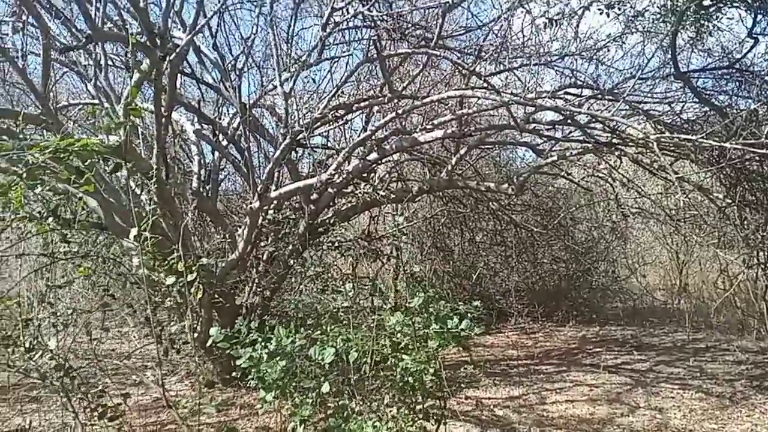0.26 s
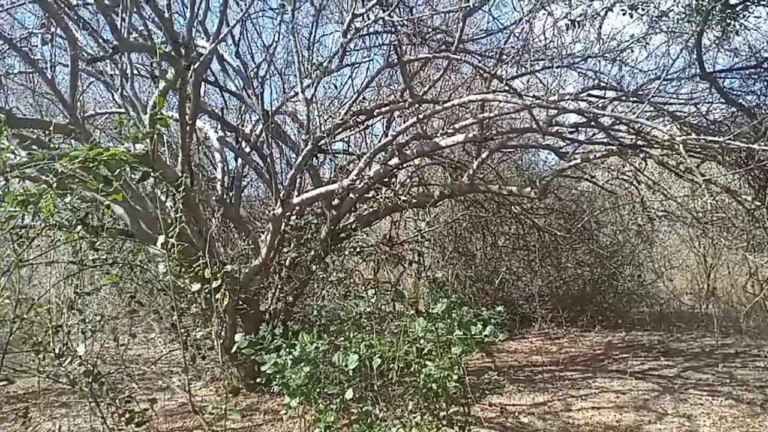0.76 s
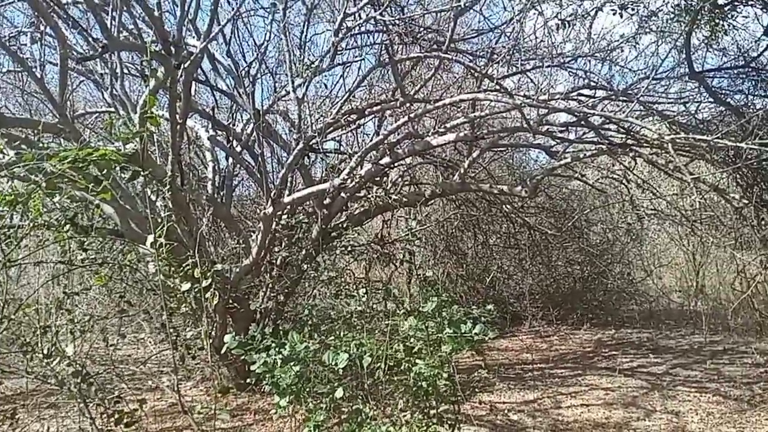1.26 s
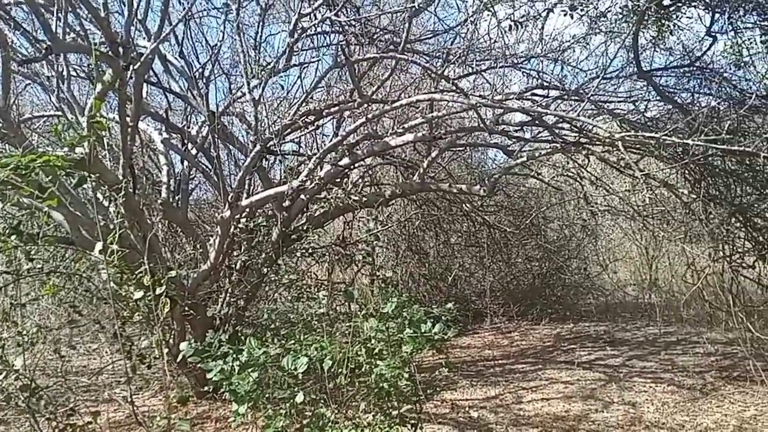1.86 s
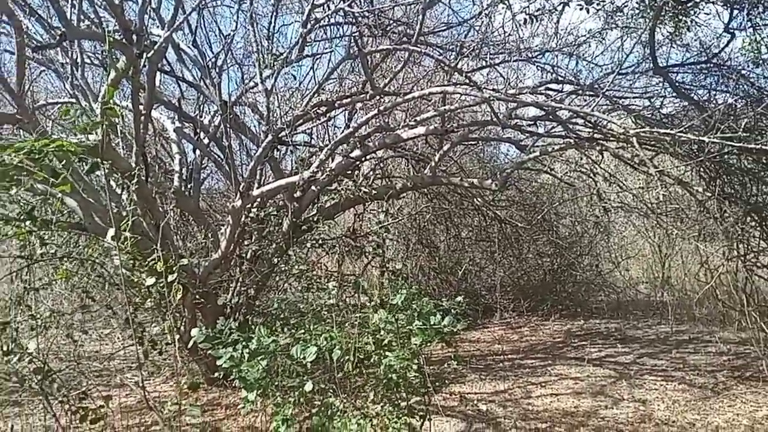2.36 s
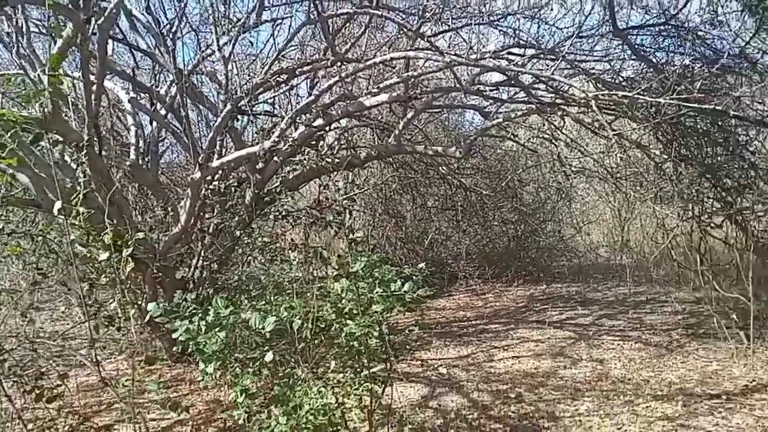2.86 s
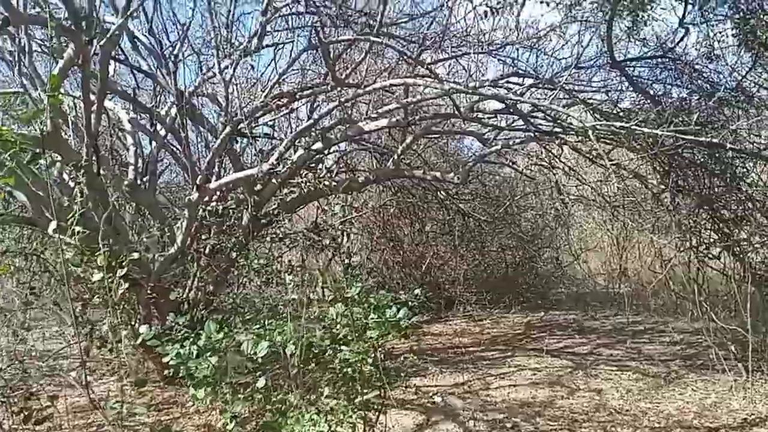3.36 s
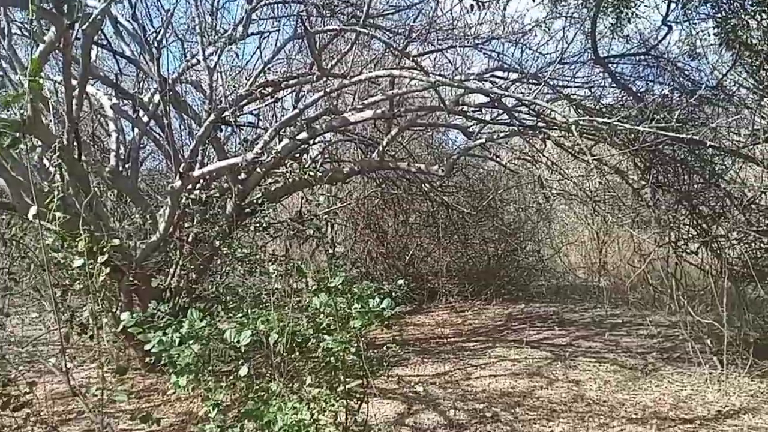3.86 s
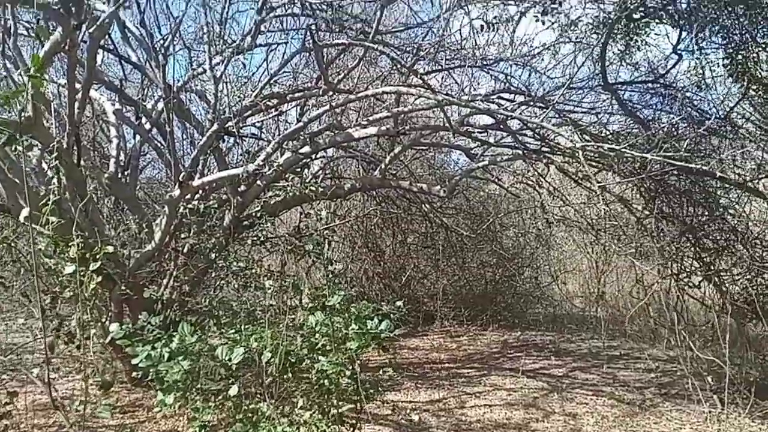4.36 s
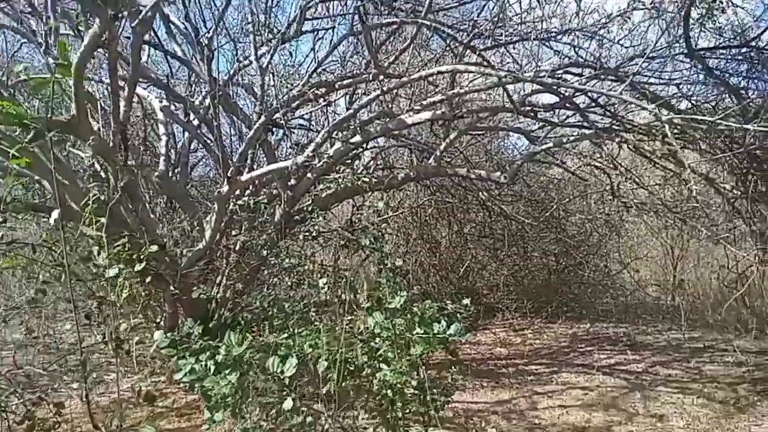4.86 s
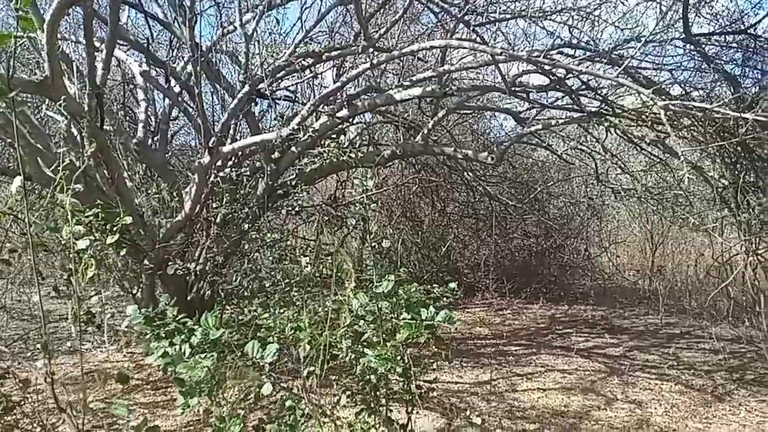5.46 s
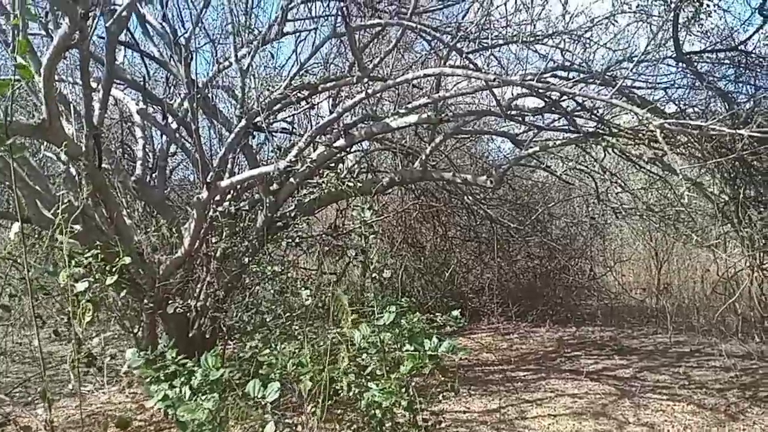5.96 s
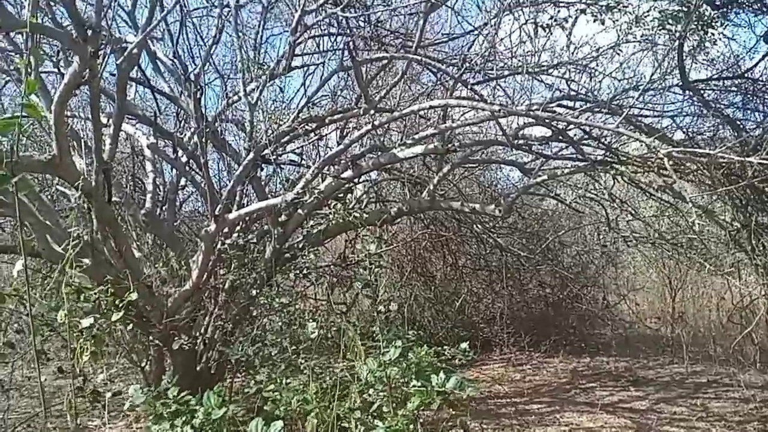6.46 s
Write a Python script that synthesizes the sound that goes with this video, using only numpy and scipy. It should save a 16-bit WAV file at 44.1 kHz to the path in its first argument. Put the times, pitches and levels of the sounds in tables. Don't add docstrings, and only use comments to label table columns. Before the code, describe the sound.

Spaced raspy bird calls echo among bare branches; a sudden low wind thump and crisp leaf-litter crackles interrupt the quiet hush.

```python
import sys
import numpy as np
from scipy import signal
from scipy.fft import rfft, irfft, next_fast_len
from scipy.io import wavfile
from scipy.ndimage import uniform_filter1d, map_coordinates

SR = 44100
rng = np.random.default_rng(int(sys.argv[2]) if len(sys.argv) > 2 else 0)


def how_loud(loudness_db):
    steps = np.asarray(loudness_db, float) / 20
    return 10 ** steps


def file_out(sig):
    cols = np.atleast_2d(sig).T
    lim = np.clip(cols, -1, 1)
    pcm = np.round(lim * 32767).astype(np.int16)
    wavfile.write(sys.argv[1], SR, pcm)


N = 295911

# pitch_hz, level_db [dB per Hz]
AIR_COLOUR = [(35, -26), (60, 0.5), (134, -2), (298, -3), (386, -4), (525, -8), (680, -7.5), (903, -9.5),
              (1450, -11), (2320, -12.5), (2610, -14), (3990, -12.5), (13000, -36), (15300, -19),
              (16800, -46)]
# pitch_hz, left_minus_right_db
LEFT_LEAN = [(60, -3), (110, -0.5), (200, 4), (380, 2.5), (700, 4), (1290, 3.5), (2380, 10), (4400, 4.5),
             (8120, 15.5), (15000, -5)]
# time_s, level_db
BREEZE = [(0.0, -59.5), (.45, -61), (1.1, -65.5), (1.79, -62), (2.1, -69.5), (3.42, -75), (4.1, -63.5),
          (4.27, -59), (4.39, -30), (4.62, -32.5), (4.68, -41.5), (4.8, -50.5), (4.99, -66.5), (5.4, -62),
          (6.04, -71), (6.71, -67)]
# pitch_hz, level_db [dB per Hz]
BUFFET_COLOUR = [(15, -56.5), (30, -12), (60, -0.5), (95, -0.5), (140, -3.5), (220, -15), (400, -27.5),
                 (700, -45.5), (1300, -120)]
# centre_s, level_db, length_s, left_minus_right_db
PUFFS = [
    (0.129, -47, 0.078, 23.5),
    (.35, -50, 0.0435, 15),
    (.88, -56, 0.025, -23),
    (.99, -53, 0.031, 10.5),
    (3.74, -57.5, 0.045, -19),
    (3.926, -60, 0.034, 7),
    (4.203, -46, 0.032, 11),
    (5.11, -59.5, 0.056, -7),
    (5.853, -60.5, 0.028, 0),
]
# centre_s, peak_db, swing_hz, swings [count], sharpness_hz
LEFT_THUMPS = [(4.208, -18.5, 91, 1.32, 199), (4.36, -17, 78, 0.88, 300), (4.405, -5.5, 184, 0.57, 530),
               (4.438, -4, 131.4, 0.44, 606), (4.468, -3.5, 173, 1.79, 400), (4.4886, 8.5, 347, 1.94, 1030),
               (4.5, -6.5, 570, 1.51, 1026), (4.5072, -7, 144.8, 0.68, 508), (4.5262, 0, 172, 0.44, 1210),
               (4.535, -11.5, 110, 1.21, 297), (4.5536, -9, 120, 1, 400), (4.6067, -10.5, 134, 0.59, 350),
               (4.623, -0.5, 141.5, 0.577, 514), (4.655, -18, 112, 0.9, 350),
               (4.733, -18.5, 98, 1.7, 243.5)]
# centre_s, peak_db, swing_hz, swings [count], sharpness_hz
RIGHT_THUMPS = [
    (0.866, -24.5, 93.6, 1, 248),
    (3.72, -32, 80, 1.5, 249),
    (5.125, -30, 86, 1.5, 249),
]
# peak_s, level_db, rise_s [per 20 dB], fall_s [per 20 dB], tilt [dB per octave]
STIRS = [(2.900, -67.5, .3, 0.28, 2), (4.075, -61.5, 0.02, 0, 5), (4.124, -50.5, 0.01, 0.0854, -2),
         (4.432, -46, 0.033, 0.06, 4), (4.465, -39, 0.0434, 0.0364, 5), (4.514, -42, 0.04, 0.14, 3.5),
         (4.540, -36.5, 0.04, 0.09, 5), (4.684, -42.5, 0.0228, 0.1067, 3.5), (4.97, -46.5, 0.03, 0.0243, 3),
         (5.045, -59, 0.1, 0.09, 0), (6.125, -33, .005, 0.06, 4), (6.195, -39.5, 0.0238, 0.12, 1.5),
         (6.255, -43, 0.0752, 0.1, -1.5), (6.318, -42.5, .04, 0.09, 2), (6.574, -57, 0.04, 0.6, 2),
         (6.652, -52, 0.0151, 0.6, -2), (6.690, -44, .006, .06, 3)]
# pitch_hz, level_db [dB per Hz]
LITTER_COLOUR = [(470, -50.5), (800, -15), (1260, -4), (1690, -2), (3520, -3), (5210, -7.5), (6710, 1.5),
                 (10200, -24), (13300, -25), (15100, -18.5), (15900, -9), (16500, -50.5)]
# start_s,
# peak_db, centre_hz
TWIG_SNAPS = [(0.2942, -39, 9200), (1.4988, -47, 7230), (1.8401, -44.5, 9510), (2.7032, -42, 8070),
              (2.761, -47, 8050), (2.7979, -37.5, 7310), (2.843, -37.5, 9110), (2.8775, -35, 6000),
              (2.9085, -33.5, 8100), (2.9238, -39, 4500), (2.9757, -30.5, 6600), (2.9832, -35.5, 7300),
              (3.5197, -42.5, 4340), (3.5599, -48.5, 6010), (3.7245, -46, 3730), (3.936, -37.5, 5160),
              (4.9269, -29.5, 7220), (5.5776, -42.5, 5410), (5.709, -44, 6200), (5.896, -45.5, 6540),
              (6.4502, -31.5, 4440), (6.4821, -34, 4330),
              (4.0757, -28.5, 6900), (4.1068, -34.5, 5140), (4.122, -15.5, 5760), (4.4298, -16, 6300),
         (4.453, -19.5, 7227), (4.4658, -15, 6000), (4.514, -17, 6100), (4.5355, -15, 6880),
         (4.5603, -15, 5200), (4.6387, -34, 8000), (4.6815, -23.5, 6880), (4.6948, -18.5, 6750),
         (4.735, -26.5, 4750), (4.97, -24, 7600), (4.9701, -15, 2650), (6.122, -15, 5630),
         (6.196, -16, 5850), (6.2136, -25.5, 5990), (6.2397, -22.5, 3000), (6.251, -19, 6210),
         (6.2978, -21.5, 6800), (6.3067, -9, 7540), (6.315, -15.5, 7160), (6.3203, -15, 8250),
         (6.3471, -21.5, 7900), (6.5775, -24, 6450), (6.615, -29, 5680), (6.651, -24, 6430),
         (6.687, -15, 2380), (6.7001, -20, 6090)]
# start_s, length_s, first_hz, last_hz, level_db
WHISTLES = [
    (1.725, .19, 3440, 3740, -70),
    (6.400, .105, 3620, 3700, -66),
    (4.240, .14, 2200, 2350, -71),
    (2.940, .095, 915, 905, -74),
    (2.420, .05, 910, 890, -70),
    (5.160, .06, 3100, 2850, -72),
]
# start_s, length_s, level_db, settled_upper_hz, octave_overtone_db
CALLS = [
    (0.025, 0.074, -33, 2610, 5),
    (0.437, 0.08, -32, 2625, 0.03),
    (1.060, 0.071, -29.5, 2645, 4),
    (1.544, 0.079, -29.5, 2595, -4.5),
    (2.397, 0.083, -28.5, 2630, 1.5),
    (3.308, .066, -27.5, 2630, 2),
    (4.765, 0.066, -29, 2645, -0.5),
    (5.346, 0.077, -31, 2615, -4),
]
# share_of_length, upper_db, lower_pitch_ratio, lower_db, mixing_db
CALL_SHAPE = [
    (0, 2.5, 1.23, -23.5, -12.5),
    (.12, -0.2, 1.2, -14.5, -4),
    (.3, -0.7, 1.14, -13, 4),
    (.6, -0.5, 1.12, -8.5, 3.5),
    (.93, -4.5, 1.1, -9, -5),
    (1, -6, 1.005, -5.5, -18.5),
    (1.25, -44, 1.0, 4, -13),
    (1.45, -62, 1.037, -30, -9),
]
MIXED_TONES = dict(zip([(3, 0), (4, 0), (5, 0), (1, 1), (2, 1), (3, 1), (4, 1), (0, 2), (1, 2), (2, 2),
               (3, 2), (2, -1), (3, -1), (4, -1), (5, -1), (1, 3), (-1, 3)],
               [-21, -34, -46, -12, -18, -38, -46, -21, -12, -30, -36, -18, -19, -30, -34, -25, -26]))
# pitch_hz, level_db [dB per Hz]
RASP_COLOUR = [(1200, -31.5), (2300, 2.5), (3500, -8), (5500, 18), (7500, 10), (9500, -46), (11500, -52),
               (14000, -28.5), (16200, -59.5)]
# pitch_hz, t60_s
ECHO_DECAY = [(1000, 0.3), (2600, 0.28), (5000, 0.22), (9000, 0.14)]


def unit(x):
    return x / np.sqrt(np.mean(x ** 2) + 1e-20)


def along(points, hz):
    f, v = np.transpose(points)
    return np.interp(np.log(hz + 1), np.log(f + 1), v)


def curves(rows, t):
    s, *cols = np.transpose(rows)
    return [np.interp(t, s, c) for c in cols]


def wobble(rate, size=N):
    knots = rng.standard_normal(int(size * rate / SR) + 4)
    return map_coordinates(knots, [np.arange(size) * rate / SR])


def filtered(x, response):
    m = next_fast_len(N + SR // 4)
    return irfft(rfft(x, m) * response(np.fft.rfftfreq(m, 1 / SR)), m)[..., :N]


def add(track, s, sound):
    part = track[:, round(s * SR):][:, :sound.shape[1]]
    part += sound[:, :part.shape[1]]


def air():
    hush = unit(filtered(rng.standard_normal((2, N)), lambda hz: how_loud(along(AIR_COLOUR, hz))))
    drift = how_loud(3 + 0.5 * wobble(2))

    def lean(hz):
        half_db = along(LEFT_LEAN, hz) / 2
        return how_loud([half_db, -half_db])

    return how_loud(-64.2549) * drift * filtered(hush, lean)


def thump(hz, swings, sharp_hz):
    t = np.arange(-SR // 20, SR // 20) / SR
    fade = np.exp(-np.abs(t) * hz * np.where(t < 0, 4.5, 3.2) / swings)
    push = np.cos(2 * np.pi * hz * t + 0.21) * fade
    f = np.fft.rfftfreq(len(t), 1 / SR)
    push = irfft(rfft(push) * np.exp(-(f / sharp_hz) ** 2), len(t))
    return push / np.abs(push).max()


def wind():
    t = np.arange(N) / SR
    calm_db, loudest_db = -61, -0.5
    db, = curves(BREEZE, t)
    pan_db = 1.1 * np.maximum(db - calm_db, 0)

    def share(left_db):
        return 2 * how_loud([0 * left_db, -left_db]) / np.sqrt(1 + how_loud(-2 * left_db))

    rumble = filtered(rng.standard_normal((2, N)), lambda hz: how_loud(along(BUFFET_COLOUR, hz)))
    rumble = unit(rumble * how_loud(3.35 * np.array([wobble(22), wobble(22)])))
    strength = how_loud(db) * share(pan_db)
    for s, level_db, length, left_db in PUFFS:
        strength += how_loud(level_db) * share(left_db)[:, None] * np.exp(-((t - s) / length) ** 2)
    out = how_loud(1) * strength * rumble
    for s, peak_db, *form in LEFT_THUMPS:
        add(out, s - 1 / 20, how_loud(min(peak_db, loudest_db) - np.array([[0], [32]])) * thump(*form))
    for s, peak_db, *form in RIGHT_THUMPS:
        add(out, s - 1 / 20, how_loud([[peak_db - 38], [peak_db]]) * thump(*form))
    return filtered(out, lambda hz: (1j * hz / 55) ** 2 / (1 + 1j * hz / 55) ** 2)


def stirring(t):
    s, db, rise, fall, tilt = np.transpose(STIRS)[:, :, None]
    away = np.where(t < s, (s - t) / rise, (t - s) / fall)
    power = how_loud(2 * np.maximum(db - 20 * away, -150)) + 1e-20
    total = power.sum(axis=0)
    return 10 * np.log10(total), (power * tilt).sum(axis=0) / total


def pair(x, left_db, lag_s):
    def response(hz):
        half_db = left_db(hz) / 2
        return how_loud([half_db, -half_db]) * np.exp(-2j * np.pi * hz * [[lag_s / 2], [-lag_s / 2]])

    return filtered(np.array([x, x]), response)


def leaves():
    hiss_db = 4
    db, tilt = stirring(np.arange(N) / SR)
    hits = rng.random((3, N)) < 1800 / SR
    strength = how_loud(4.6 * rng.exponential(size=(3, N)).clip(0, 2.2))
    cracks = hits * rng.standard_normal((3, N)) * strength
    grain = unit(cracks + 0.6 * cracks.sum(axis=0)) * how_loud(2.5 * wobble(150))
    grain += 0.45 * rng.standard_normal((3, N))

    def below(hz, edge_hz):
        return 1 / (1 + (hz / edge_hz) ** 4)

    def thirds(hz):
        bands = [below(hz, 4500), below(hz, 9300) - below(hz, 2833), 1 - below(hz, 6900)]
        return how_loud(along(LITTER_COLOUR, hz)) * bands

    dull, middle, bright = filtered(grain, thirds)
    gain = uniform_filter1d(how_loud(db + hiss_db), size=64) / np.std(dull + middle + bright)
    near = gain * (how_loud(-tilt) * dull + middle + how_loud(1.12 * tilt) * bright)
    tail = how_loud(-60 * np.arange(2000) / SR / 0.027) * rng.standard_normal((2, 2000))
    scattered = signal.fftconvolve(near[None], tail, axes=1)[:, :N]
    scattered = how_loud(-5.5) * unit(scattered) * np.std(near) * how_loud([[3], [-3]])
    return pair(near, lambda hz: along(LEFT_LEAN, hz), lag_s=0.000912) + scattered


def crackle(count):
    above_leaves_db, spread_db, centre_hz = 14, 5, 6000
    when, size, pitch = rng.random((count, 3)).T
    s = 0.01 + when * (N / SR - 0.02)
    db = stirring(s)[0] + above_leaves_db - spread_db * np.log(1 - size)
    hz = centre_hz * how_loud(9 * (pitch - 0.5))
    return [row for row in zip(s, db, hz) if row[1] > -60]


def twigs():
    left_db, edge_db, edge_top_hz = 11, -22, 11000
    out, t = np.zeros((2, N)), np.arange(SR // 25) / SR
    f = np.fft.rfftfreq(len(t), 1 / SR)
    edge = how_loud(edge_db) * f ** 2 / (f ** 2 + 2500 ** 2) / (1 + (f / edge_top_hz) ** 4) * (f < 16200)
    fade = (how_loud(-60 * (t - 0.001) / 0.0025) + 0.08 * how_loud(-60 * t / 0.025)) * (t > 0.001)
    for s, db, hz in TWIG_SNAPS + crackle(count=900):
        pan_db = rng.normal(left_db, 3.7)
        crack = rng.standard_normal(len(t)) * fade
        body = how_loud(0.63 * along(LITTER_COLOUR, f) - 15.3 * np.log2((f + 1) / hz) ** 2)
        crack = irfft(rfft(crack) * (body + edge), len(t))
        snap = how_loud(min(db, -15) - 4.5) * crack / np.abs(crack).max()
        ears = np.array([np.pad(snap, (40, 0))[:len(t)], snap])
        add(out, s - 0.001, ears * how_loud([[pan_db / 2], [-pan_db / 2]]))
    return out


def far_birds():
    out = np.zeros((2, N))
    for s, length, first_hz, last_hz, db in WHISTLES:
        u = np.arange(0, 1, 1 / SR / length)
        hz = last_hz + (first_hz - last_hz) * np.exp(-u / 0.35)
        hz *= 1 + 0.008 * wobble(146, size=len(u))
        tone = np.sin(2 * np.pi * np.cumsum(hz) / SR) * signal.windows.tukey(len(u), 0.5)
        shimmer_db = 3.5 * np.array([wobble(35.3, size=len(u)) for ear in "LR"])
        add(out, s, how_loud(db + 4 + shimmer_db) * tone * how_loud([[3], [-3]]))
    return out


def echoes(x, gap_s, lumpy_db):
    trees_db, trees_s, trees_spread_s = -9, 0.19, 0.07
    hz, t, z = signal.stft(rng.standard_normal((2, SR // 2)), SR, nperseg=256)
    fading_db = -60 * t / along(ECHO_DECAY, hz)[:, None]
    trees = how_loud(trees_db + fading_db / 1.8) * np.exp(-((t - trees_s) / trees_spread_s) ** 2)
    tail = signal.istft(z * (how_loud(fading_db) + trees), SR, nperseg=256)[1]
    size = tail.shape[1]
    tail = tail * (1 - np.exp(-np.arange(size) / SR / gap_s)) * how_loud(lumpy_db * wobble(32.4, size=size))
    return signal.fftconvolve(x[None], tail / np.linalg.norm(tail[0]), axes=1)


def jay():
    lower_hz, closing_db, rasp_db = 1632, -14, -16.5
    onset_s, onset_lift_hz, onset_db = 0.027, 125, -2.5
    turns_away_s, turned_top_hz, turned_rasp_db = 4.5, 10300, 6
    out, t = np.zeros((2, N)), np.arange(SR // 5) / SR
    size = len(t)
    f = np.fft.rfftfreq(size, 1 / SR)

    def flutter():
        return how_loud(3.5 * wobble(240, size=size) + 2.5 * wobble(80, size=size))

    def phase(hz):
        return 2 * np.pi * np.cumsum(hz) / SR

    for s, length, level_db, settled_hz, octave_db in CALLS:
        turned = s > turns_away_s
        up_db, low, low_db, mix_db = curves(CALL_SHAPE, t / length)
        settling = np.exp(-t / onset_s)
        effort_db = level_db + onset_db * settling
        upper_hz = settled_hz + onset_lift_hz * (settling - 1 / 10)
        a = phase(upper_hz * (1 + 0.025 * np.exp(-t / 0.004) + 0.0077 * wobble(408, size=size)))
        b = phase(lower_hz * low * (1 + 0.016 * wobble(395.4, size=size)))
        mixed = 0
        for (m, n), db in MIXED_TONES.items():
            mixed = mixed + how_loud(db + rng.normal(0, 2.85)) * flutter() * np.sin(m * a + n * b)
        rasp = unit(irfft(rfft(rng.standard_normal(size)) * how_loud(along(RASP_COLOUR, f)), size))
        rough = mixed + how_loud(rasp_db + turned_rasp_db * turned) * flutter() * rasp
        upper = flutter() * np.sin(a) + how_loud(octave_db) * flutter() * np.sin(2 * a) + how_loud(mix_db) * rough
        lower = flutter() * np.sin(b)
        voice = how_loud(effort_db + up_db - 3) * upper + how_loud(low_db + level_db + closing_db) * lower
        voice *= np.sin(np.pi / 2 * np.clip(t / 0.002, 0, 1)) ** 2 * (t < 1.45 * length)
        if turned:
            voice = irfft(rfft(voice) / (1 + (f / turned_top_hz) ** 20), size)
        near = np.array([np.pad(voice, (46, 0))[:size], voice])
        add(out, s, near * how_loud([[0.1], [-2]]))
        add(out, s, how_loud(-3.5) * echoes(voice, gap_s=0.00109, lumpy_db=4))
    return out * how_loud([[6], [-1]])


def scene():
    return air() + wind() + leaves() + twigs() + far_birds() + jay()


def low_pass(x):
    return signal.sosfilt(signal.butter(12, 17120, fs=SR, output="sos"), x)


def record(dry):
    return low_pass(dry)


dry = scene()
out = record(dry)
file_out(out)
```